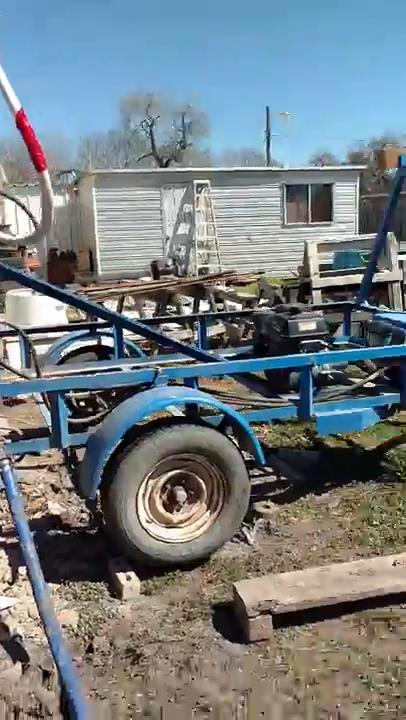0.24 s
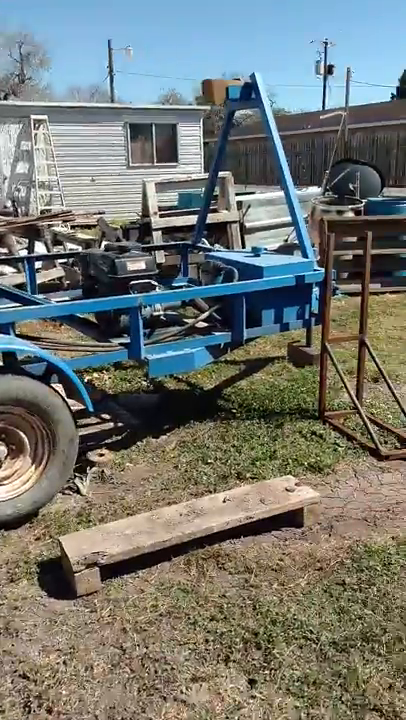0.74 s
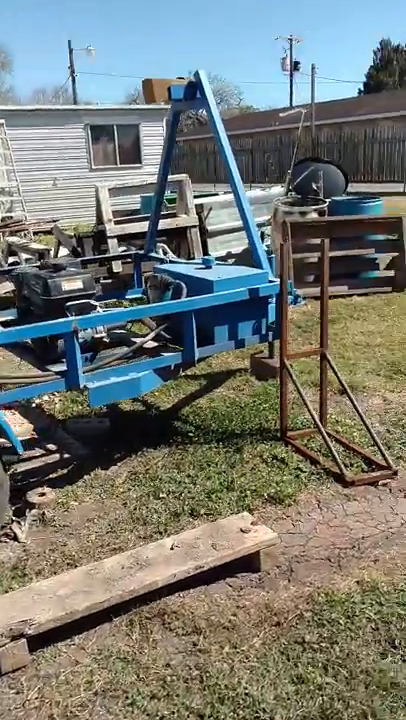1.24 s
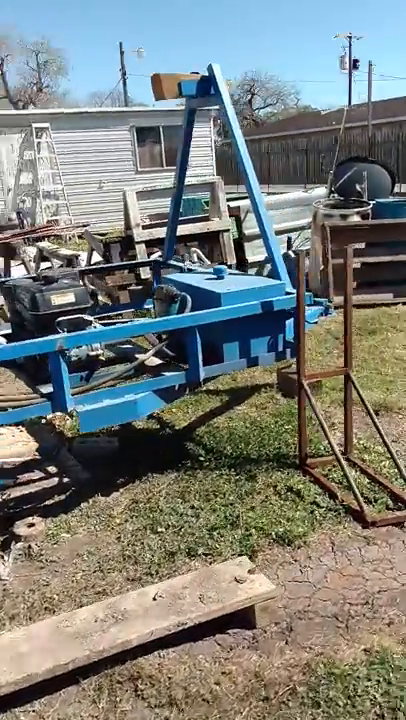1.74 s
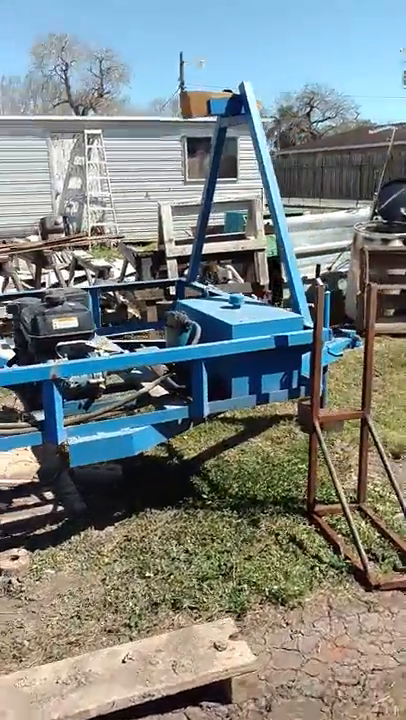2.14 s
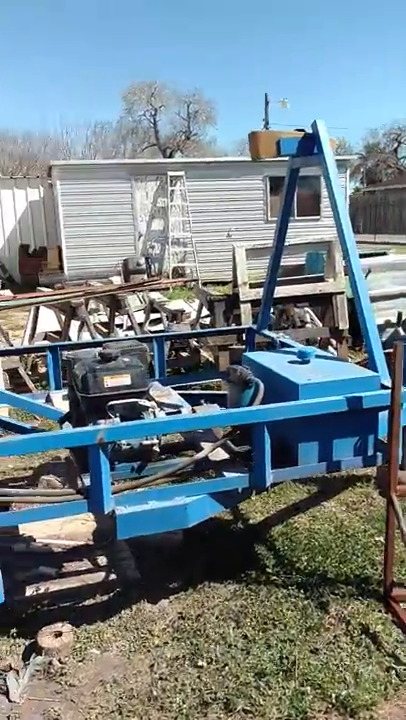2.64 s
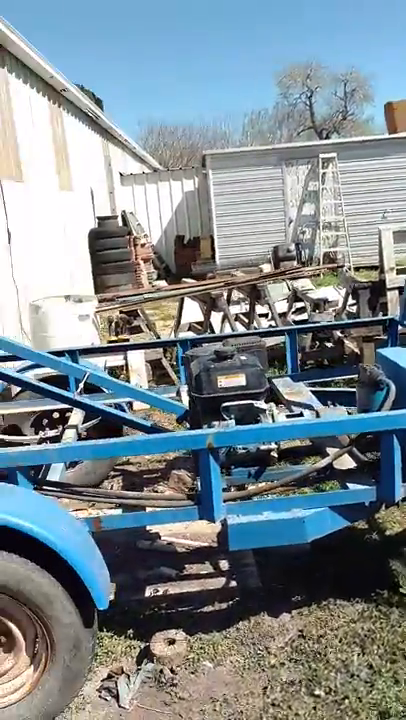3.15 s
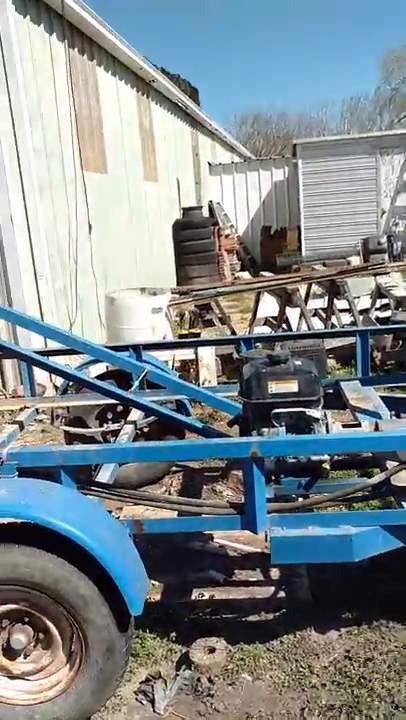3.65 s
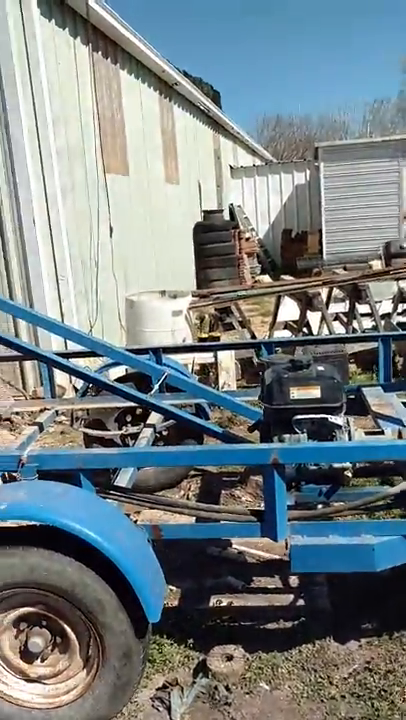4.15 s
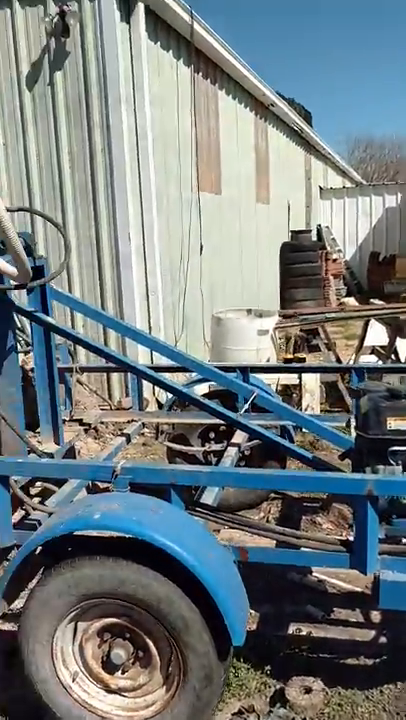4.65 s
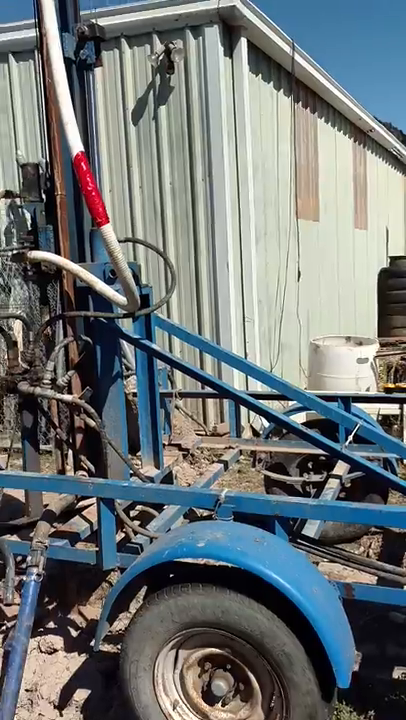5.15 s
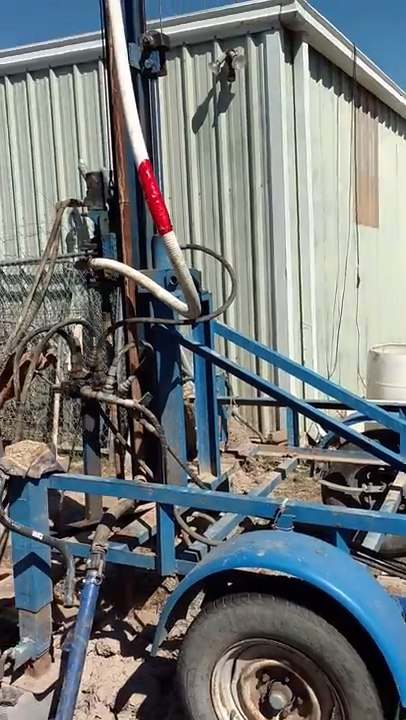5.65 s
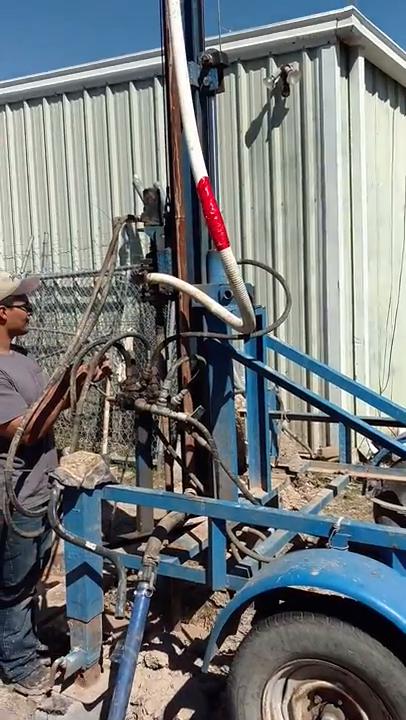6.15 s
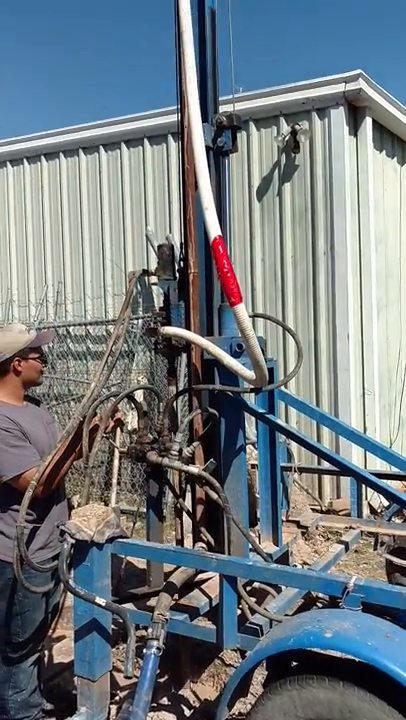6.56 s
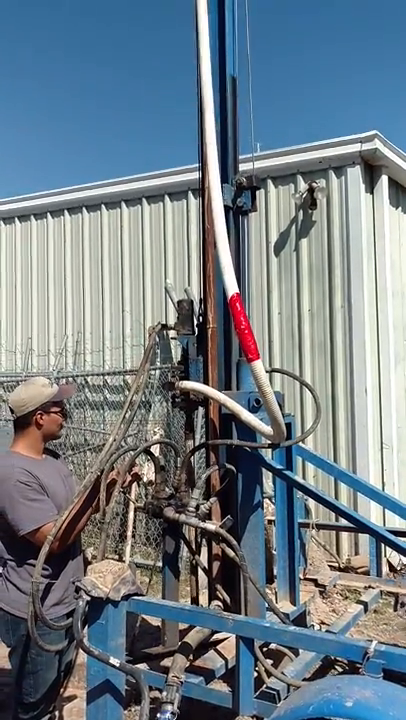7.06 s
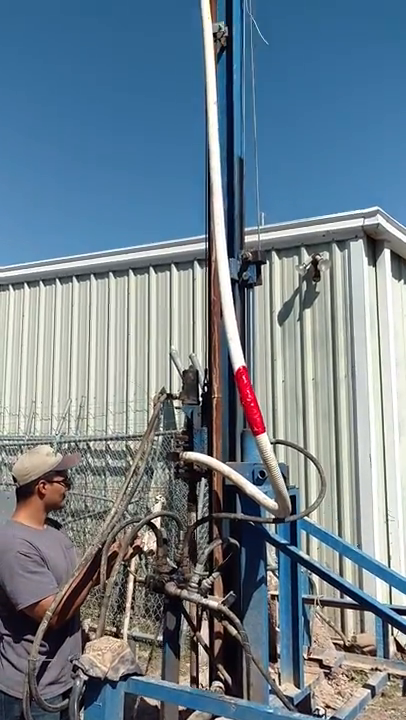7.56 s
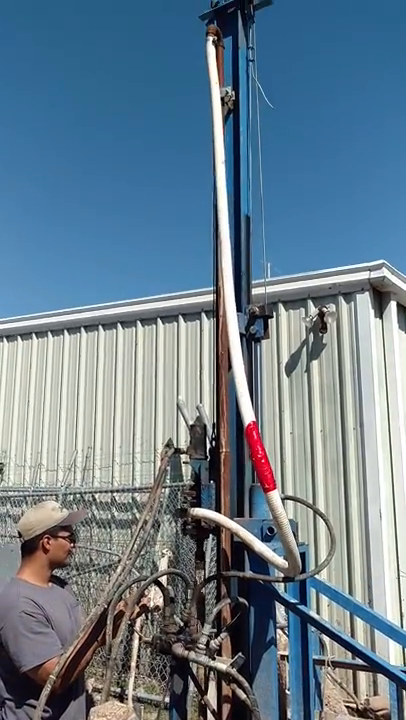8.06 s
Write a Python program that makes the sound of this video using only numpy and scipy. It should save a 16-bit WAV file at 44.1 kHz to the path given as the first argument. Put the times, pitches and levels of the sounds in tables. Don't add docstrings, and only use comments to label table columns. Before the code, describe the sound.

A continuous loud motor noise: a rough exhaust drone with a gear-pump whine, a second slower engine slightly out of tune, and a broad, harsh, tinny roar with rapid ticking valves. No starts or stops. The second engine's ringing casing emerges as the phone moves nearer, after about three seconds. Close, dry outdoor stereo sound, shifting as the phone turns, with small pumping dips.

```python
import sys
import numpy as np
from scipy import signal
from scipy.fft import rfft, irfft, next_fast_len
from scipy.io import wavfile
from scipy.ndimage import map_coordinates

SR = 44100
rng = np.random.default_rng(int(sys.argv[2]) if len(sys.argv) > 2 else 0)


def ratio_of_db(decibels):
    return 10 ** (np.asarray(decibels, float) / 20)


def transcribe(u):
    v = np.clip(np.atleast_2d(u).T, -1, 1)
    q = np.round(v * 32767).astype(np.int16)
    wavfile.write(sys.argv[1], SR, q)


N = 366030

# (time [s], speed [firings/s])
RIG_SPEED = [
    (0, 26.637),
    (4.2, 26.637),
    (4.3, 26.68),
    (8.3, 26.68),
]
# (frequency [Hz], arrival [share of cycle])
PUMP_BLAST = [
    (50, .7),
    (130, .43),
    (2000, .45),
]


def rms_one(x):
    return x / np.sqrt(np.mean(x ** 2) + 1e-20)


def in_time(rows):
    time_s, *columns = np.transpose(rows)
    return [np.interp(np.arange(N) / SR, time_s, column) for column in columns]


def at_hz(points, hz):
    point_hz, value = np.array(points).T
    return np.interp(np.log(hz + 1), np.log(point_hz), value)


def humps(modes, hz):
    return sum(ratio_of_db(2 * db) / (1 + (2 * (hz - top_hz) / width_hz) ** 2) for top_hz, width_hz, db in modes)


def drift(rate_hz):
    pole = np.exp(-80 * np.pi * rate_hz / SR)
    noise = rng.standard_normal(N // 40 + 2002)
    slow = signal.lfilter([1], [1, -2 * pole, pole * pole], noise)[2000:]
    return np.interp(np.arange(N) / 40, np.arange(len(slow)), rms_one(slow - slow.mean()))


def later(x, ms):
    return map_coordinates(x, [np.arange(N) - ms * SR / 1000], order=3, mode="mirror")


def cycles(speed, wander):
    return np.cumsum(in_time(speed)[0] * (1 + wander * drift(3.04))) / SR


def blast(levels, speed_hz, arrival, smear):
    hz = speed_hz * np.arange(1, len(levels) + 1)
    delay_cycles = at_hz(arrival, hz) + smear * rng.standard_normal(len(hz))
    return levels * np.exp(-2j * np.pi * np.cumsum(delay_cycles))


def hum(turns, speed_hz, orders, lead_ms, unsteady, rate_hz, count=4):
    hz = speed_hz * np.arange(1, len(orders) + 1)
    lead = np.exp(2j * np.pi * hz * lead_ms / 1000)
    out, at = 0, turns % 1 * 2048
    for k in range(count):
        varied = k > 0
        lines = orders * np.exp(2j * np.pi * rng.random((2, len(hz))) * varied)
        echo = lines[1] * np.minimum(hz / 2000, 1) * varied
        spectra = np.pad([lines[0], lines[0] * lead + echo], ((0, 0), (1, 0)))
        wave = [np.interp(at, np.arange(2049), np.append(c, c[0])) for c in irfft(spectra, 2048)]
        out = out + np.array(wave) * (unsteady * drift(rate_hz) if varied else 1)
    return rms_one(out)


def rig_engine(turns, near_db):
    orders_db = [-47, -21, -22, -24, 0.5, -1, -9, -8, -1.5, -6.5, -2, -18, -6, -19.5, -7.5, -8, -5, -9, -22,
                 -7, -2.5, 3, -11.5, -22, -3.5, -23, -8.5, -24, -14, -15, -26, -48, -13, -21, 1]
    # (frequency [Hz], arrival [share of cycle])
    arrival = [(50, 1.25), (130, 1.2), (210, .88), (250, .93), (275, .52), (345, .5), (375, .92),
               (900, .95)]
    orders = -blast(ratio_of_db(orders_db), 27.07, arrival, smear=0.08)
    hz = RIG_SPEED[0][1] * np.arange(1, len(orders) + 1)
    bark_orders = orders / abs(orders) * humps([(482, 160, 0)], hz)
    exhaust = hum(turns, 30.8, orders, lead_ms=0.28, unsteady=0.1, rate_hz=3.3)
    bark = hum(turns, 31.0, bark_orders, lead_ms=0.29, unsteady=0, rate_hz=1, count=1)
    return ratio_of_db(-25.5 + 0.52 * near_db) * exhaust + ratio_of_db(-40.5 - 0.79 * near_db) * bark


def pump_exhaust(turns, near_db):
    orders_db = [-50, -34, -37, -10.5, -3, -7, -17, -0.5, -3.5, -4.5, 0, 4.5, -1.5, -5.5, 0, 0.5, -15, -29,
                 -17, -15, -11, -32]
    orders = blast(ratio_of_db(orders_db), 22.7, PUMP_BLAST, smear=.5)
    return ratio_of_db(-28 + near_db) * hum(turns, 25.4, orders, lead_ms=0.19, unsteady=0.15, rate_hz=3.3)


def pump_casing(turns, near_db):
    # (frequency [Hz], width [Hz], level [dB])
    modes = [(881, 23, -3), (1036, 20, 5.5), (1114, 84, -2.5), (1394, 44, -5), (1512, 21, -0.5),
             (1994, 137, -6), (2258, 5.6, -6.5)]
    levels = np.sqrt(humps(modes, 22.7 * np.arange(1, 110)))
    levels[:30] = 0
    orders = blast(levels, 24.0, PUMP_BLAST, smear=0.706)
    ring = hum(turns, 27.0, orders, lead_ms=0.086, unsteady=0.25, rate_hz=8.3)
    return ratio_of_db(-24 + 2.6 * near_db) * ring


def clatter(turns, fade_cycles, depth):
    valves = [
        (.25, 0.36),
        (.5, 1),
        (.92, 1),
        (0.029, 0.2),
    ]
    beats = sum(strength * np.exp(-((turns - share) % 1) / fade_cycles) for share, strength in valves)
    return 1 + depth * (beats - beats.mean())


def port_noise(hz, size):
    # (time [s], port lead [ms], direct share [0-1])
    turn = [(0, .275, .95), (.9, .28, .93), (1.4, .295, .9), (2.15, .31, .88), (2.4, .31, .3),
            (4.6, .3, .25), (5, .29, .6), (5.7, .29, .8), (6.3, .3, .7), (6.9, .305, .85), (7.45, .305, .8),
            (7.7, .31, .25), (8.3, .31, .25)]
    # (frequency [Hz], level [dB per Hz])
    roar_db = [(35, -30), (100, -23), (250, -13), (500, -8.5), (800, -3), (1400, -1), (2200, -0.5),
               (2900, 1), (4500, -13), (6500, -18), (9000, -20), (12000, -25), (14500, -28.5), (15500, -34)]
    # (frequency [Hz], width [Hz], level [dB])
    shrouds = [
        (1343, 210, 6),
        (2140, 280, 0.5),
        (3696, 110, 5.5),
        (7050, 340, 0),
    ]
    # (frequency [Hz], likeness [0-1])
    likeness = [(60, 0.32), (250, 0.89), (600, 0.69), (1200, 0.7), (2000, 0.012), (6000, 0.0083),
                (15000, .01)]
    lead_ms, direct_share = in_time(turn)
    sparks = 1 + 2.1 * (rng.random((3, N)) < 900.0 / SR)
    direct, *scattered = rng.standard_normal((3, N)) * sparks
    heard = np.array([later(direct, lead_ms + .004 * drift(4.0)), direct])

    def mixed(share):
        return rfft(np.sqrt(share) * heard + np.sqrt(1 - share) * scattered, size)

    direct_share = np.clip(direct_share, 0, 1)
    middle, short = mixed(direct_share), mixed(direct_share * 0.18)
    treble = short + (middle - short) / (1 + (2980 / (hz + 1)) ** 10) / (1 + (hz / 6150) ** 10)
    alike = np.clip(at_hz(likeness, hz), 0, .999)
    ports = alike * rfft(heard, size) + np.sqrt(1 - alike) * treble
    return ports * ratio_of_db(at_hz(roar_db, hz)) * np.sqrt(1 + humps(shrouds, hz))


def roar(rig_turns, pump_turns, near_db, aim_db, patchy_db):
    size = next_fast_len(N)
    hz = np.arange(size // 2 + 1) * SR / size
    ports = port_noise(hz, size)
    zones, together = np.zeros((3, 2, N)), drift(7.4)
    for centre_hz in 40 * 2 ** np.arange(0, 9.5, .5):
        band = np.cos(np.pi * np.clip(np.log2((hz + 1) / centre_hz), -.5, .5)) ** 2
        zone = int(centre_hz > 1000) + int(centre_hz > 5000)
        gain_db = patchy_db * (0.6 * together + drift(1.05))
        if 1200 < centre_hz < 1900:
            gain_db = gain_db - 0.53 * near_db
        zones[zone] += irfft(ports * band, size)[:, :N] * ratio_of_db(gain_db)
    rumble, body, hiss = (rms_one(zone) for zone in zones)
    valve_share = 0.46 - 0.069 * near_db
    puff = 1 + 0.088 * np.cos(2 * np.pi * (pump_turns - .3))
    rumble = rumble * ratio_of_db(-25 + 0.71 * near_db + 0.39 * aim_db)
    body = body * ratio_of_db(-21.5 + aim_db) * clatter(rig_turns, 0.13, 0.29 * valve_share) * puff
    hiss = hiss * ratio_of_db(-29 + 0.075 * aim_db) * clatter(rig_turns, 0.15, 0.92 * valve_share) * puff
    return rumble + body + hiss


def scene():
    # (time [s], nearness of the pump [dB], phone aimed at the shrouds [dB])
    walk = [(0, -5, -2), (.8, -5, -2.5), (1.7, -4, -4.5), (2.3, -3, -1.5), (3, -0.5, 1.5), (3.4, 0, 2.5),
            (4.2, 0, 3), (5, 0.5, 1), (5.7, 0.5, 0), (6.4, -0.5, -0.5), (7, 0.5, -1.5), (7.6, -1, -2.5),
            (8.3, -1, -2)]
    # (time [s], speed [firings/s])
    pump_speed = [
        (0, 22.725),
        (5, 22.725),
        (5.5, 22.67),
        (8.3, 22.66),
    ]
    near_db, aim_db = in_time(walk)
    rig, pump = cycles(RIG_SPEED, wander=0.00057), cycles(pump_speed, wander=0.000964)
    engines = rig_engine(rig, near_db) + pump_exhaust(pump, near_db) + pump_casing(pump, near_db)
    return engines + roar(rig, pump, near_db, aim_db, patchy_db=.5)


def ducking():
    # (time [s], depth [dB], hold [s])
    ducks = [(-.04, 3, .02), (0.207, 2, .08), (0.495, 2.5, 0.18), (.91, 1, .2), (1.335, 1, 0.044),
             (1.495, 0.5, .3), (2.41, 0.5, 0.045), (2.63, 0.6, 0.15), (2.83, 2, 0.24), (3.445, 2, 0.15),
             (4.16, 1.5, .08), (4.486, 2.5, .08), (5.05, 2, 0.026), (5.367, 1.5, 0.023), (5.62, 2, .1),
             (5.95, 1.5, .2), (6.255, 1, 0.091), (6.673, 1, 0.09), (7.222, 1.5, 0.029), (7.49, 1, 0.15)]
    attack_s, release_s = 0.027, 0.11
    t = np.arange(0, N + 40, 40) / SR
    curves = []
    for start_s, depth_db, hold_s in ducks:
        corners_s = np.cumsum([0, attack_s, abs(hold_s) + 1e-4, release_s])
        curves.append(np.interp(t - start_s, corners_s, [0, depth_db, depth_db, 0]))
    return -np.interp(np.arange(N) / SR, t, np.max(curves, axis=0))


def roll_off(x):
    return signal.sosfilt(signal.butter(12, 15530, fs=SR, output="sos"), x)


def record(dry):
    lag_samples = 17
    ports = dry * ratio_of_db([[-1.2], [0]])
    late = np.pad(ports[::-1], ((0, 0), (lag_samples - 1, 0)))[:, :N]
    late = signal.lfilter([.08, .84, .08], 1, late)
    beams = (ports - 0.73 * late) * ratio_of_db([[1.2], [-.3]])
    zero, pole = np.exp(-2 * np.pi * np.array([600., 120.]) / SR)
    beams = signal.lfilter([.7, -.7 * zero], [1, -pole], beams) * ratio_of_db(ducking())
    return roll_off(1.376 * np.tanh(beams / 1.224))


dry = scene()
out = record(dry)
transcribe(out)
```